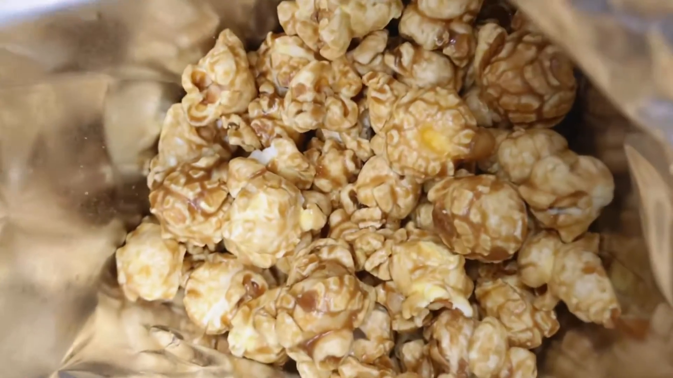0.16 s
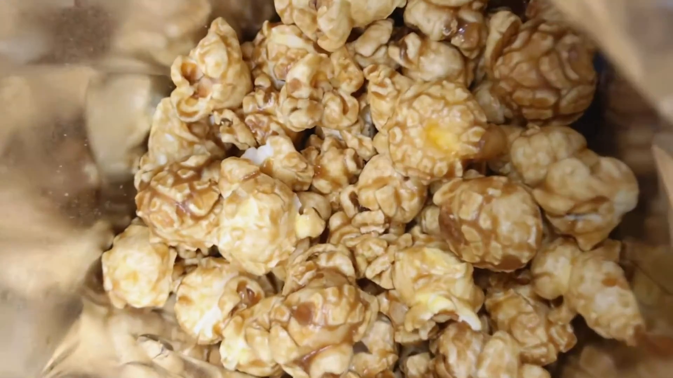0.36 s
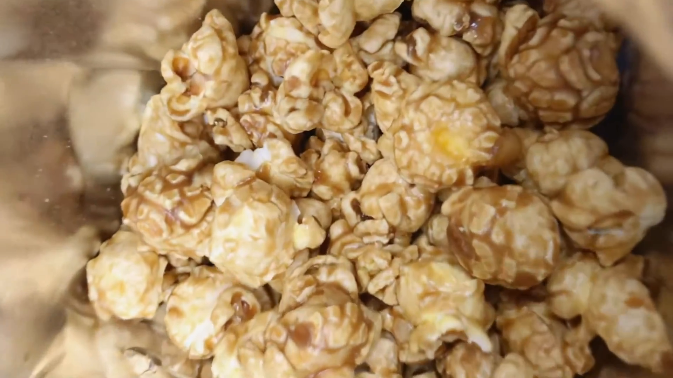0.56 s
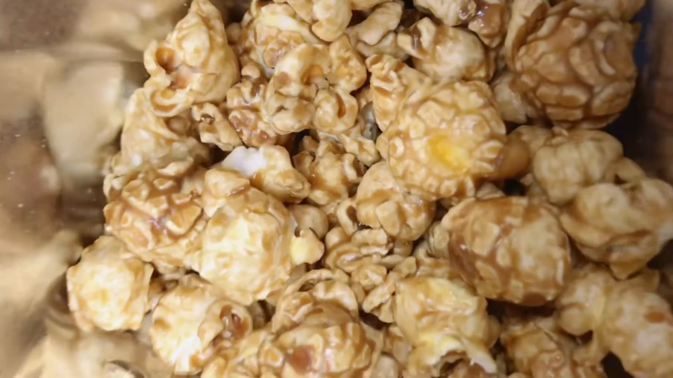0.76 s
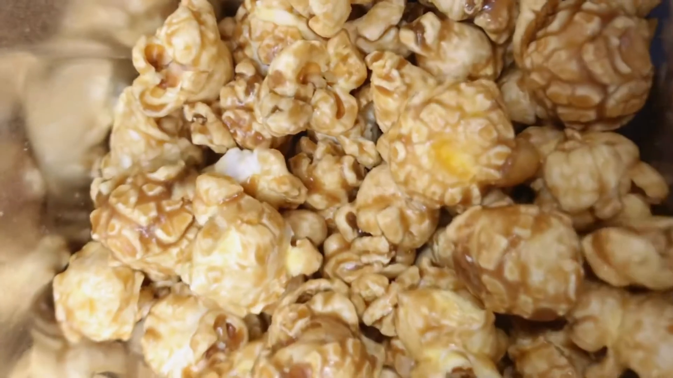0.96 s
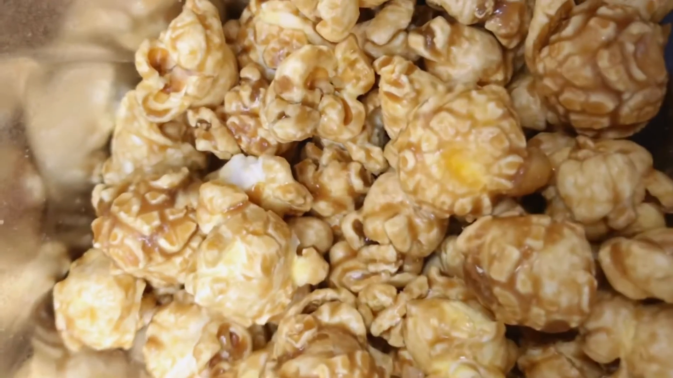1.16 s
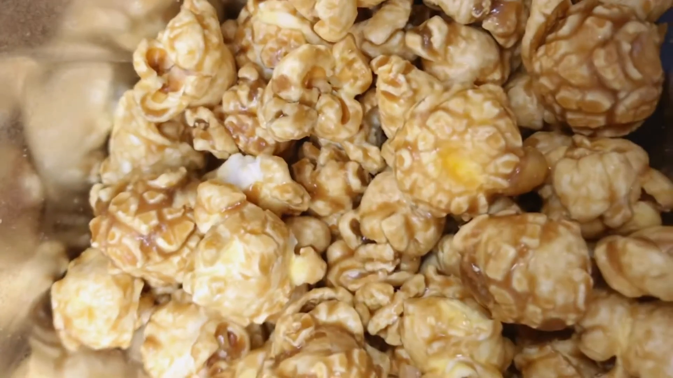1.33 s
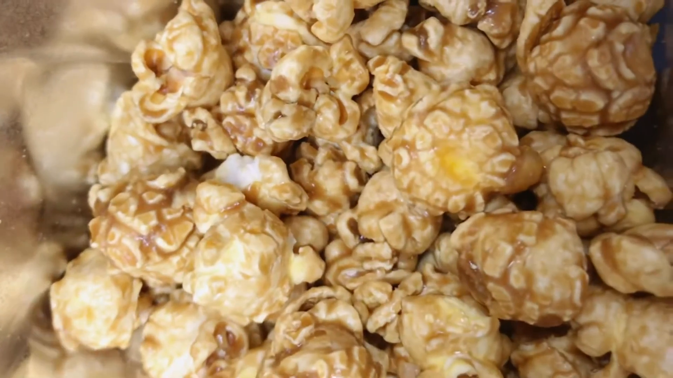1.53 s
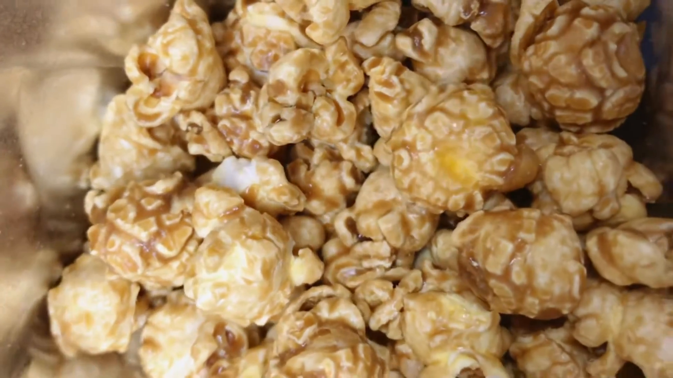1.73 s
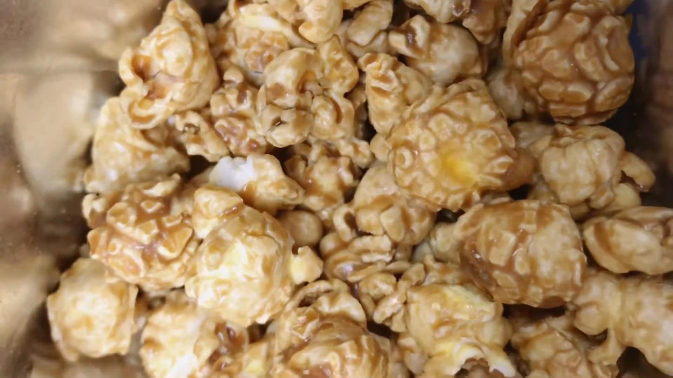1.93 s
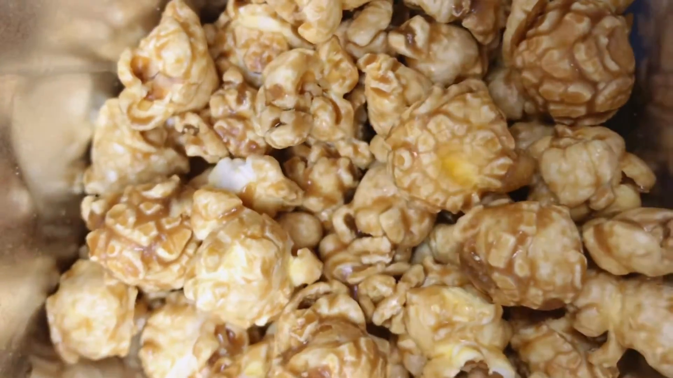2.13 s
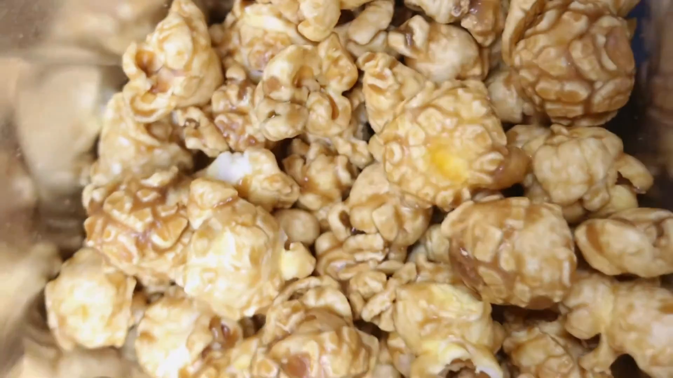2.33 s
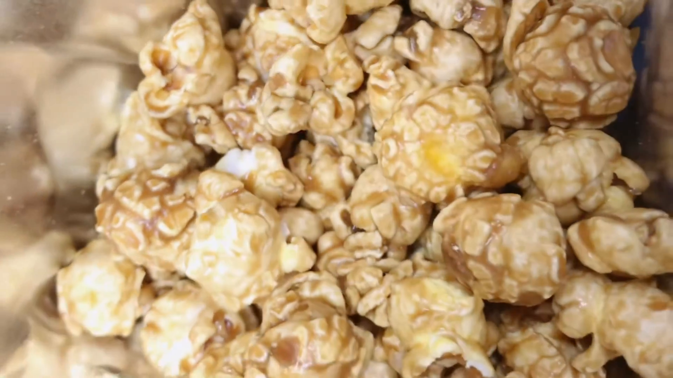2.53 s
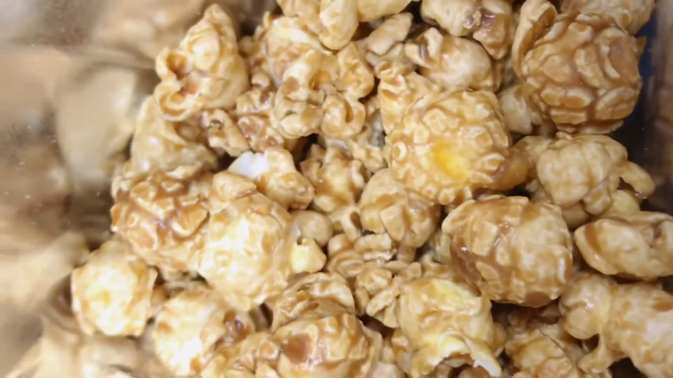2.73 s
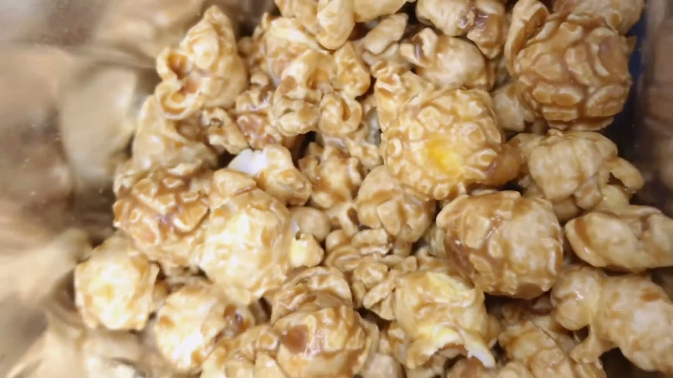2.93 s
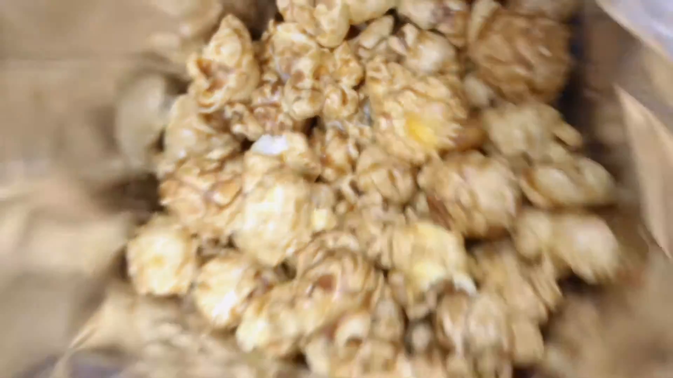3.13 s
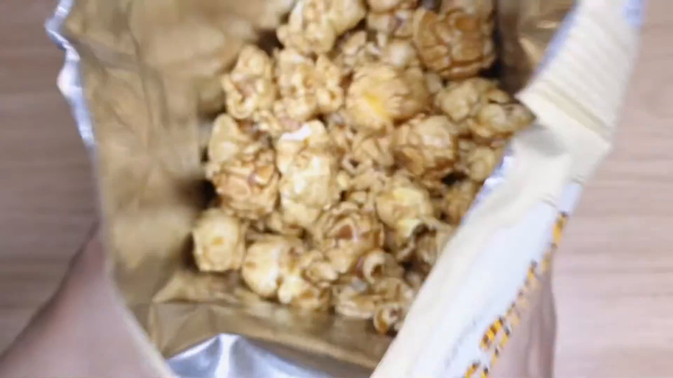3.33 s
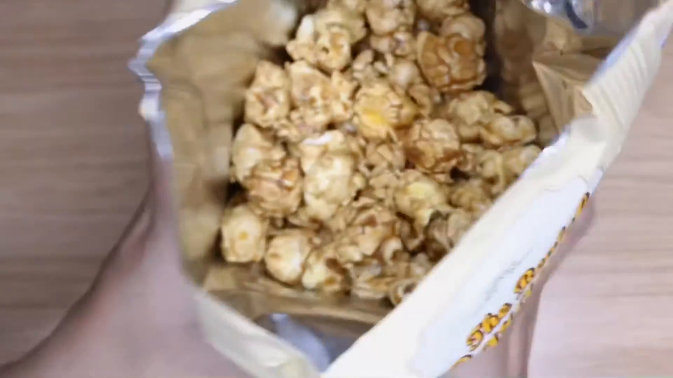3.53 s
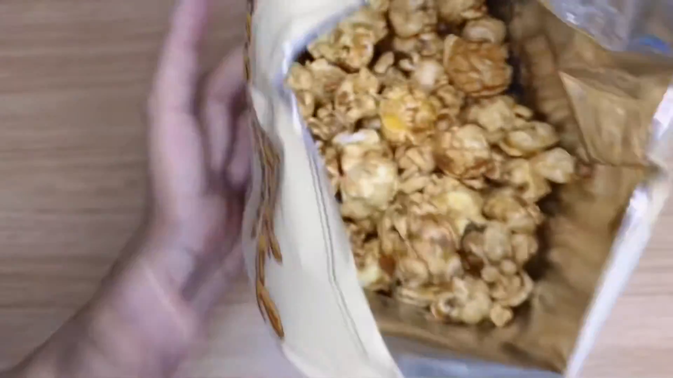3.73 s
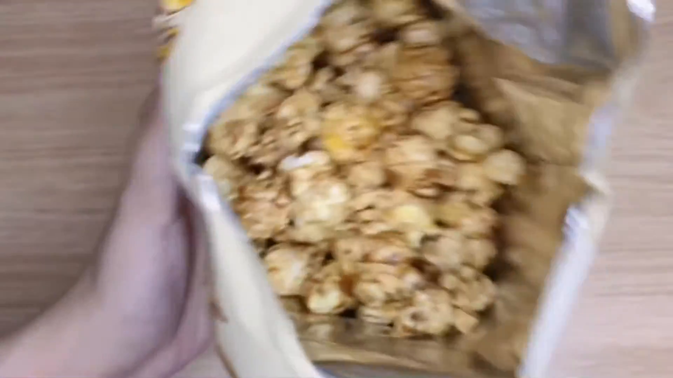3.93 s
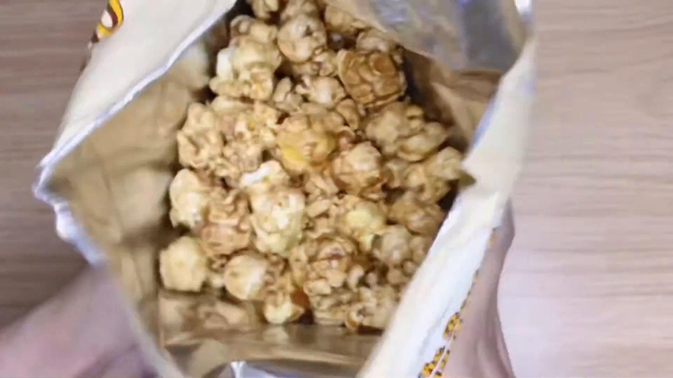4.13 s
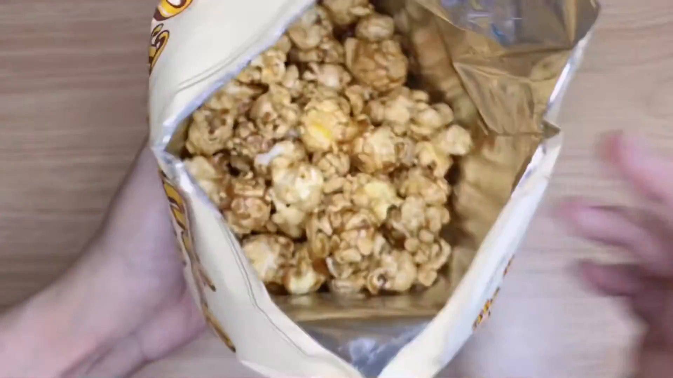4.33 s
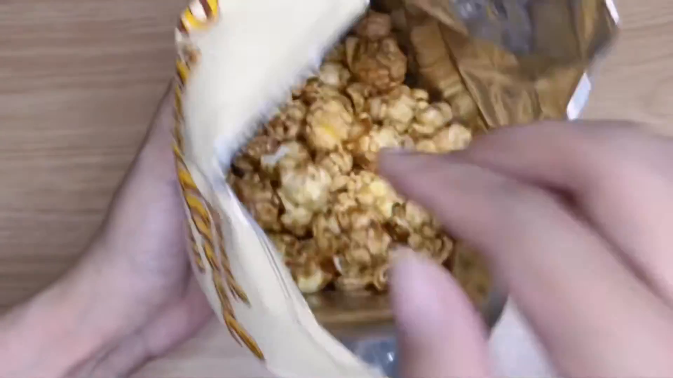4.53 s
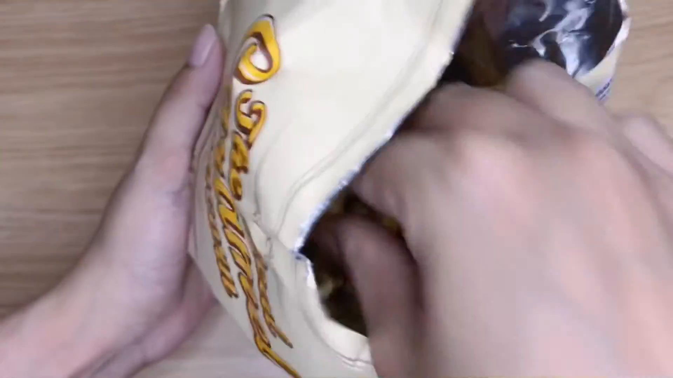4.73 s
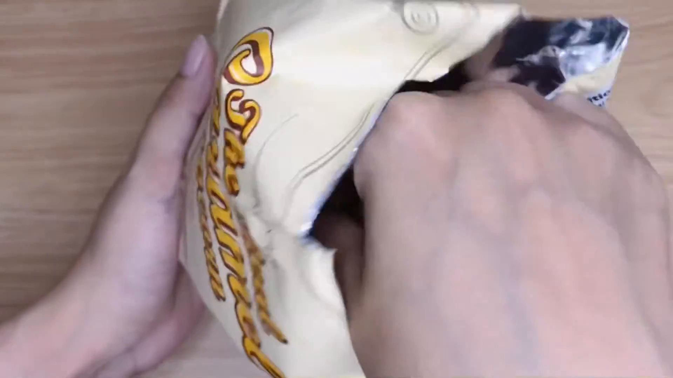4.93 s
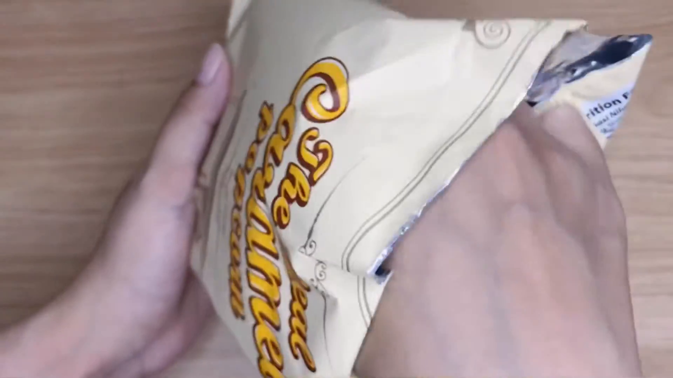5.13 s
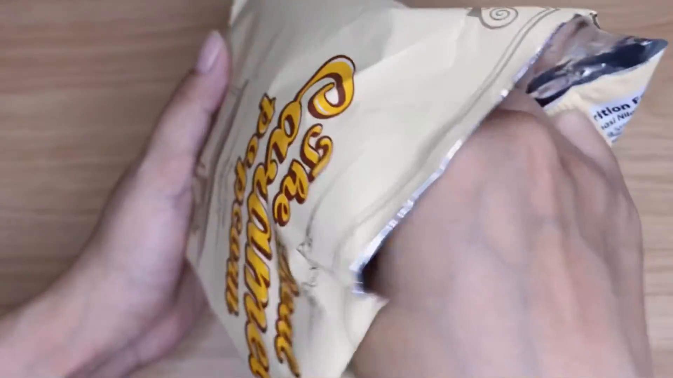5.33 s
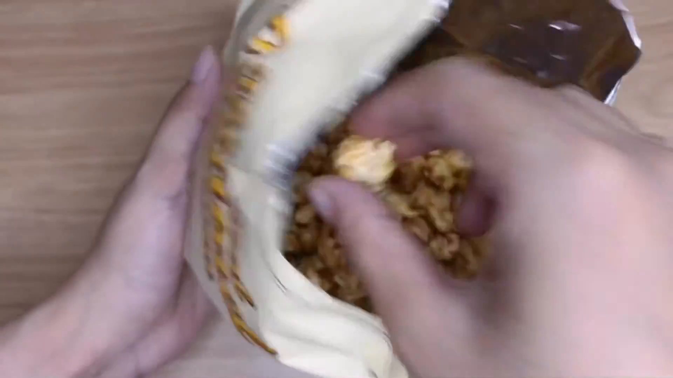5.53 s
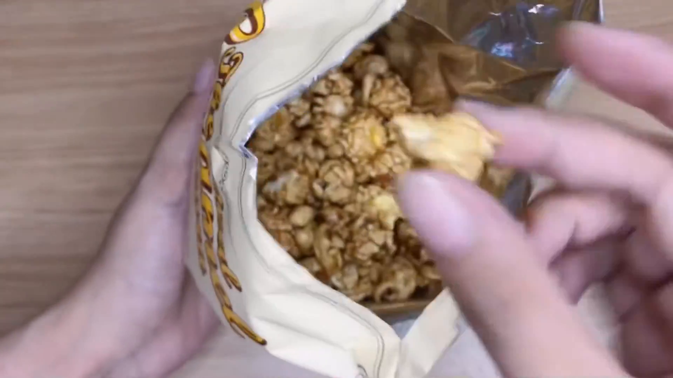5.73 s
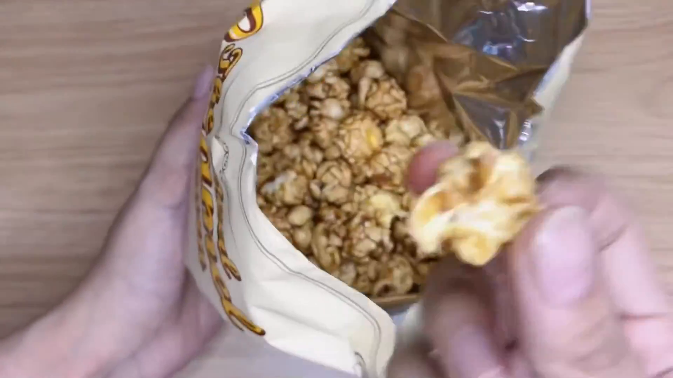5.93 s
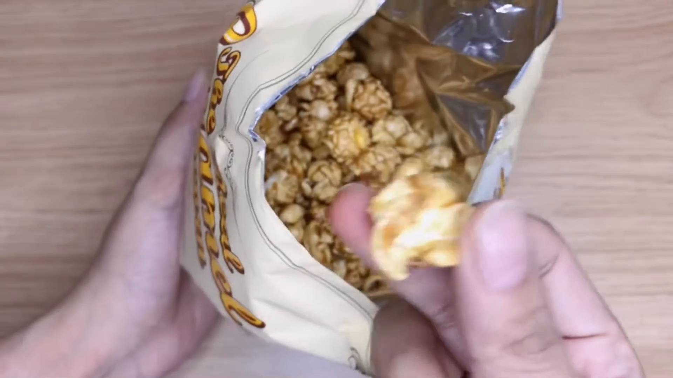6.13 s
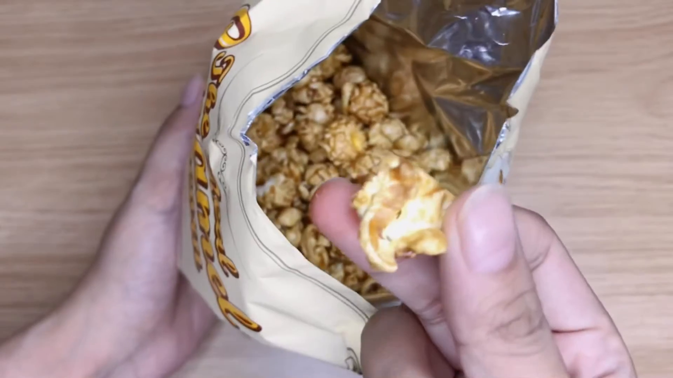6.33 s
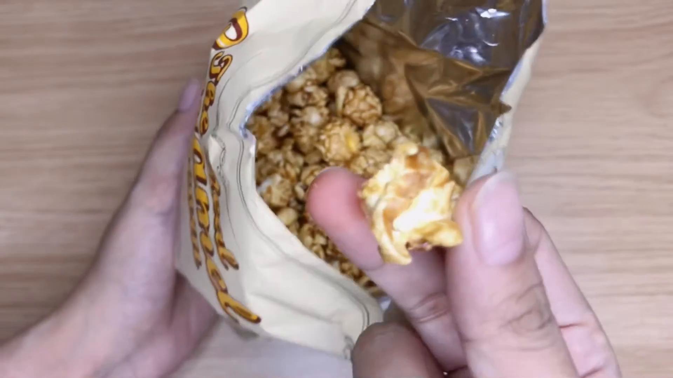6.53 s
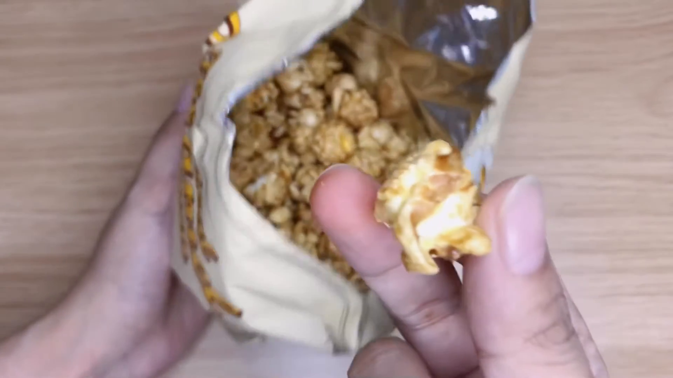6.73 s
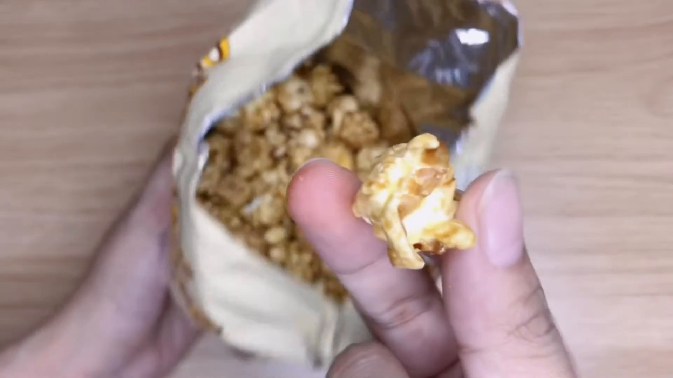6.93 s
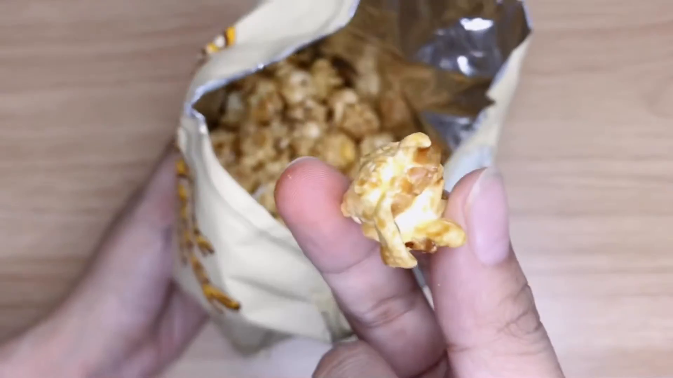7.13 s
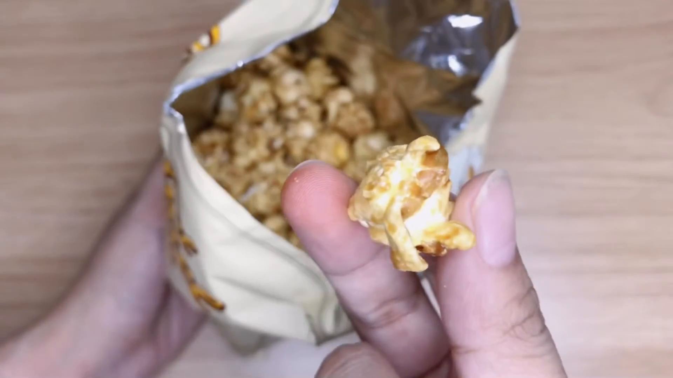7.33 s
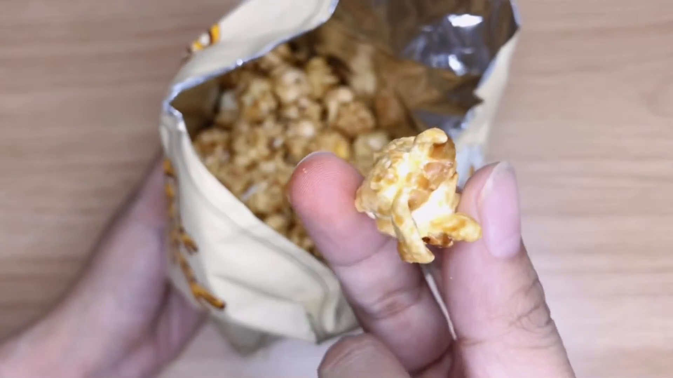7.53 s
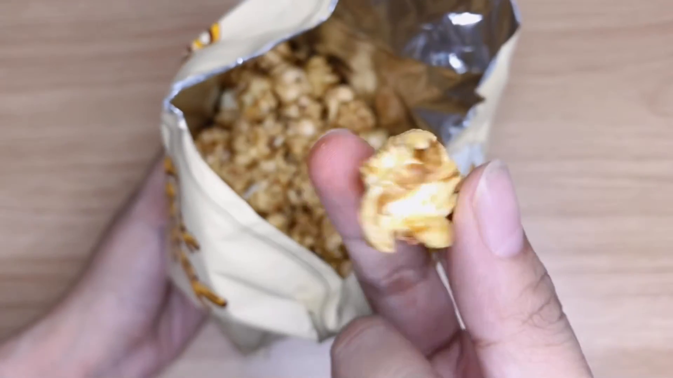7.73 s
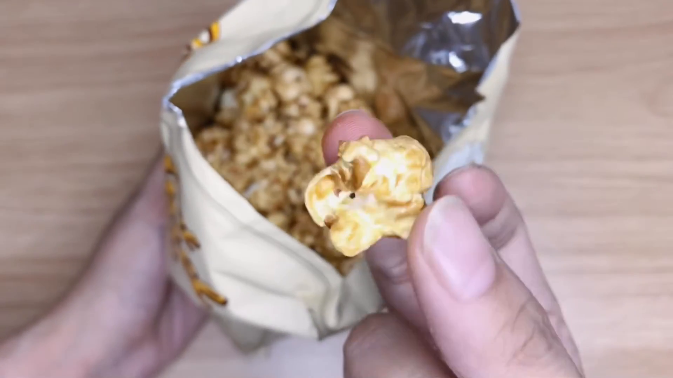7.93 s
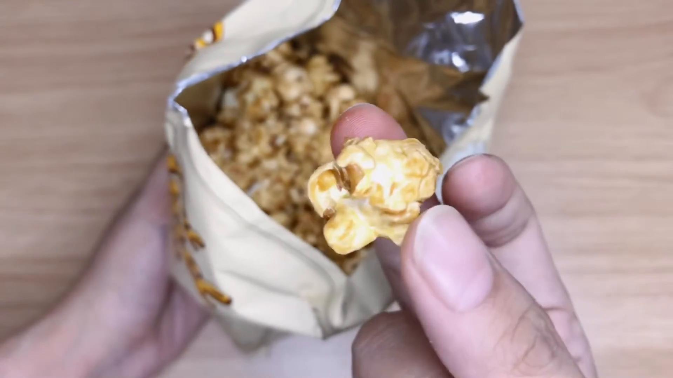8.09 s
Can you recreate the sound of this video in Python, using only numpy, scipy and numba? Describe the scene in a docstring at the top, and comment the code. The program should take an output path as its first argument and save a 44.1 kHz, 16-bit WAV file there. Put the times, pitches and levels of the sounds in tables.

```python
"""In a small soft room with a low hum, a foil-lined snack bag is held close to a phone,
then stands open on a table and is dug into by hand. Creases in the foil buckle and ring
the panels as sums of damped sines; sliding skin and foil give crackle, short squeaks and
band-filtered noise. Soft blows boom, handling rumbles as low thuds over shaped noise,
and near surfaces answer with a short decaying tail of noise."""
import sys
import numpy as np
from scipy import signal
from scipy.fft import rfft, irfft
from scipy.io import wavfile
from scipy.ndimage import uniform_filter1d
from numba import njit

SR = 44100
rng = np.random.default_rng(int(sys.argv[2]) if len(sys.argv) > 2 else 0)


def digitize_waveform(pressure):
    """Quantize a signal to 16-bit integers and store it at the path in sys.argv[1].

    Rows of a 2-D input are taken as channels; values are limited to [-1, 1].
    """
    field = np.atleast_2d(pressure).T
    bounded = np.clip(field, -1, 1)
    quanta = np.round(bounded * 32767).astype(np.int16)
    wavfile.write(sys.argv[1], SR, quanta)


N = 359856
TIME = np.arange(N) / SR  # s
SET_DOWN_S = 3.1  # the bag leaves the phone and comes to stand open on the table

# Spectrum of the room's hum and hiss. Each row: frequency in Hz, relative density in dB per Hz.
ROOM_SPECTRUM = [(25, -39.5), (47, -11.5), (70, 4.5), (108, -20.5), (167, -19.5), (584, -27), (1980, -35),
                 (2670, -36.5), (13300, -45), (15200, -41), (16500, -68.5)]
ROOM_TONE_DB = -49.5  # rms before the hum wavers

# Reverberation of table and near walls. Each row: frequency in Hz, time to fall by 60 dB in s.
REVERBERATION = [(300, 0.15), (3000, 0.22), (8000, 0.13), (15000, 0.021)]
ECHO_DB = -18.5  # energy of the tail re the direct sound

# Spectrum of the handling shudder. Each row: frequency in Hz, relative density in dB per Hz.
SHUDDER_SPECTRUM = [(30, -52), (60, -0.5), (120, -6.5), (250, -2), (450, -8.5), (800, -16.5)]

# Movements of hand and bag. Each row: start in s, time held in s, nominal time to die by 20 dB in s
# (scaled for hiss and rumble; zero or less stops almost at once), relative hiss level in dB,
# its brightness in dB re hiss, relative rumble level in dB.
MOVEMENTS = [(0.2, 0.032, 1.5, -65, 1, -53.5), (0.3, 0.022, -0.1, -41.5, -12, -51),
             (0.628, 0.1, 0.5, -50, -3.5, -43), (0.944, 0.011, 0.4, -52.5, -12, -34),
             (1.071, 0.028, 0.32, -38, -26, -31), (1.4, 0.037, 0.22, -37, -15.5, -45),
             (1.534, 0.011, 0.25, -59, -8, -44), (1.645, 0.017, 0.1, -59, 6, -40.5),
             (1.74, 0.13, -0.1, -57, -4, -55), (1.86, 0.062, 0.03, -49, -1.5, -39),
             (2.24, 0.072, 0.8, -68, 5, -50.5), (3.02, 0.07, 3.5, -54.5, -0.5, -47.5),
             (3.111, 0.096, 0.67, -46, -3.5, -40.5), (3.208, 0.077, 0.04, -38, -2.5, -39),
             (3.355, 0.028, 2, -61, -12.5, -52.5), (3.453, 0.0042, 0.15, -32.5, -2, -34.5),
             (3.614, 0.16, 0.13, -43, -2.5, -41.5), (3.93, 0.015, -1.6, -48, -1.5, -67),
             (3.981, 0.013, 0.14, -31.5, -4.5, -35), (4.03, 0.097, 0.2, -44.5, 4, -36.5),
             (4.14, 0.037, 0.29, -37, -4.5, -30), (4.234, 0.073, 0.09, -34, 2, -29),
             (4.55, 0.061, 2.5, -50, 2.5, -52), (4.63, 0.029, 0.4, -37.5, -19, -38),
             (4.685, 0.085, 0.41, -32, -5, -30.5), (4.96, 0.058, 0.3, -42.5, -5.5, -34.5),
             (5.001, 0.016, 0.06, -30, -10, -34), (5.055, 0.0049, 0.2054, -34, 0, -36.5),
             (5.251, 0.038, 0.42, -40, -4.5, -47), (5.401, 0.068, 0.69, -44.5, -7, -40),
             (5.5, 0.0093, 0.16, -39, 7, -46), (5.55, .08, -0.16, -51, 8.5, -48.5),
             (5.737, 0.0083, 0.26, -50.5, 24, -43), (6.26, 0.039, 0.87, -61.5, -1.5, -50),
             (6.615, 0.037, 0.23, -45.5, -8, -78), (6.719, 0.094, 0.34, -57, -2, -63),
             (6.894, 0.063, -0.01, -46.5, -1, -53.5), (6.979, 0.013, 0.1057, -40.5, -4, -38),
             (7.055, 0.023, 0.01, -51.5, -14, -67)]
HISS_RISE_S, HISS_FADE = 0.017, 0.72  # time to gain the last 20 dB; factor on the dying time
RUMBLE_RISE_S, RUMBLE_FADE = 0.04, 0.58  # the heavier rumble starts slower
REST_HISS_DB, REST_BRIGHT_DB, REST_RUMBLE_DB = -68.5, 2, -61.5  # the hands merely hold the bag
CONTROL_STEP = 64  # samples between computed points of the movement curves

# Soft blows of bag, hands and snack. Each row: time of touch in s, relative level in dB,
# nominal pitch in Hz.
BLOWS = [(0.197, -26, 555), (0.678, -28, 165), (0.756, -31.5, 190), (0.939, -32, 187), (1.167, -15, 311),
         (1.381, -36, 203), (1.533, -33, 240), (1.571, -30.5, 151.6), (1.756, -19.5, 376),
         (1.846, -35.5, 135), (2.243, -37.5, 156), (3.121, -27, 423), (3.203, -20, 290), (3.258, -22, 251),
         (3.452, -16, 214), (3.975, -28.5, 174), (4.157, -20.5, 176), (4.233, -16.5, 370),
         (4.673, -19.5, 560), (4.716, -17, 1030), (4.76, -16.5, 304), (4.805, -17.5, 1070),
         (4.993, -21, 610), (5.181, -34.5, 347), (5.403, -26, 463), (5.723, -26, 442), (6.43, -36, 323),
         (6.586, -31.5, 1000), (6.975, -23, 339), (7.516, -34.5, 400)]

# Spectrum of sliding skin and foil. Each row: frequency in Hz, relative density in dB per Hz.
SLIDE_SPECTRUM = [(240, -30), (400, -7), (906, -11.5), (2050, -11), (4510, -14), (10400, -15.5),
                  (16000, -20.5)]

# Fingertips rubbing a taut patch of foil. Each row: start in s, length in s,
# base pitch of the patch in Hz, relative level in dB.
FOIL_RUBS = [(1.395, 0.048, 1880, -47), (1.445, .052, 3900, -47.5), (1.53, 0.028, 3620, -51),
             (1.675, 0.015, 2620, -52), (1.702, 0.019, 3600, -51), (1.771, .02, 2900, -56),
             (3.335, .06, 1880, -55), (5.742, .06, 6000, -52), (5.933, 0.077, 4000, -57.5),
             (5.989, .024, 2700, -50), (6.625, .055, 3000, -55)]

# Partials of a rubbed patch. Each row: ratio to the base pitch, relative level in dB.
PATCH_PARTIALS = [(1, 3), (1.55, -1.5), (2.2, -6.5), (3.1, -9)]

# Resonances of the bag's panels. Each row: frequency in Hz, relative level in dB,
# nominal time to fall by 60 dB in s.
PANEL_MODES = [(742, -6, 0.018), (1136, -1, 0.021), (1700, -0.5, 0.018), (2350, -8.5, 0.011),
               (3134, -5.5, 0.018), (4250, -5, 0.014), (5100, -7.5, 0.011), (6577, 0, 0.01),
               (8580, 0.5, 0.011), (11420, 0.5, 0.0078), (13540, -4, 0.012)]
BIG_PANEL_HZ = 1800  # panels that ring below this count as big
CRISP_FROM_HZ = 4110  # crispness counts in full an octave above this, and more further up

# Loud creases that buckle. Each row: time in s, relative level in dB, big panels in dB re level,
# crispness near 8 kHz in dB re level.
CREASES = [(0.2036, -40, 9.5, -15), (0.31, -33.5, -5, -22), (0.465, -47.5, 15.5, -22),
           (0.6658, -32, -13, -8), (0.6829, -8, -2, -7.5), (0.908, -45.5, 4.5, 3.5),
           (0.9452, -36.5, 1.5, -6.5), (1.021, -25, -12, -38), (1.0265, -22.5, -26, -9.5),
           (1.042, -26, -7, -16), (1.056, -28.5, -16, -30), (1.073, -31, -20, -30), (1.093, -29, -16, -20),
           (1.1705, -8.5, 1.5, -8), (1.179, -21, 1, -32), (1.375, -46, 8, -8), (1.64, -34, -5, -18),
           (1.6576, -34.5, -9, -4.5), (1.7313, -35, -5, -20), (1.76, -41, 14.5, -31), (1.8621, -35, 2, -10),
           (1.881, -39, 4, -12), (1.9023, -37, -8, 1.5), (1.9198, -19.5, -3.5, -26), (3.004, -39, -4, -2.5),
           (3.1313, -25.5, -2, -7), (3.158, -32.5, 11.5, -26), (3.2082, -8, -4, -7),
           (3.2152, -24.5, -4, -5), (3.256, -18, -3.5, -13), (3.265, -23, -3.5, -7.5),
           (3.2857, -23.5, 5.5, -27), (3.3564, -33, -4, -32), (3.4486, -7.5, -1.5, 2),
           (3.6176, -17, -2.5, -4), (3.631, -9, -7.5, -13), (3.6551, -18, 0, -9.5), (3.6836, -6, -17, -25),
           (3.7328, -10, -16, -21), (3.7735, -32, 5.5, -4), (3.81, -24, -7, -17), (3.819, -22.5, -3.5, -5),
           (3.83, -20.5, -5.5, -24), (3.976, -25.5, 7, 0), (3.9866, -20.5, 1.5, -3.5),
           (4.086, -27, -1, -31), (4.1386, -14, -5.5, -15), (4.15, -14, -3, -31), (4.1611, -7.5, -5.5, -1),
           (4.2371, -8, -9, -6), (4.251, -14, -6.5, -27), (4.298, -21, -24, -28), (4.5475, -28, -5, -12),
           (4.6141, -7.5, -2, -12.5), (4.6397, -26.5, -2, -16), (4.665, -21, -3, -17), (4.6768, -3, -5, -4),
           (4.7023, -18, -10, -5), (4.7181, -19, -3.5, -6), (4.728, -24, -9, -15), (4.744, -10, -20, -0.5),
           (4.757, -12, -5, -2.5), (4.7604, -6.5, -13, -4), (4.764, -4.5, -1, -20),
           (4.8122, -15, -10, -8.5), (4.816, -3.5, -15, -7), (4.835, -23.5, -3, -0.5),
           (4.8556, -2.5, -9.5, -13.5), (4.9405, -9, -17.5, -8.5), (4.9516, -15.5, -1.5, -3),
           (4.968, -28, -1, -24), (4.985, -17, -2, -13), (4.9979, -3.5, -15, -3.5), (5.001, -8, -13.5, 1),
           (5.007, -15, -14, -14), (5.022, -26, -5.5, -15), (5.0579, -6, -13.5, -12),
           (5.069, -6.5, -36, -12), (5.0879, -11.5, -36, 0), (5.136, -28, -1, -24),
           (5.233, -13.5, -3.5, -12), (5.2576, -7.5, -3, -7.5), (5.2889, -9, -17.5, -17),
           (5.3178, -30, 0, -9), (5.369, -17.5, -4, -23), (5.407, -7, -25, -12.5), (5.4253, -29, 5.5, 2.5),
           (5.4385, -12.5, -11, -11), (5.478, -13, -23.5, -18.5), (5.489, -27.5, -19.5, -1),
           (5.5054, -5, -18.5, -1.5), (5.68, -17, -20, -42), (5.7345, -8, -15.5, 3),
           (5.8293, -31.5, -10, -10), (6.5747, -13, -0.5, -41), (6.6143, -5, -12.5, -15),
           (6.803, -44.5, -17, 0), (6.855, -37, -10, -2.5), (6.866, -37, -12, -3), (6.878, -36, -10, -5),
           (6.9, -29, -6.5, -18), (6.9278, -16.5, -9, -8.5), (6.9792, -22, -7, -11),
           (7.0495, -38.5, 15, -20), (7.519, -40.5, 10, -13)]

CAVITY_HZ, CAVITY_Q, CAVITY_DB = 1087, 7.6, -3.5  # the air inside the open bag

# Dips of the phone's sound port. Each row: frequency in Hz, sharpness Q.
PORT_NOTCHES = [(4800, 21.4), (7600, 13), (10400, 13)]
TOP_HZ = 16000  # upper limit of the phone


def undb(db):
    """Logarithmic levels: decibels to amplitude gain."""
    return 10 ** (np.asarray(db) / 20)


def colour(x, shape):
    """Spectral shaping: weight x by (Hz, dB) points joined along log frequency, then bring to rms 1."""
    hz, db = np.transpose(shape)
    bins = np.maximum(np.fft.rfftfreq(len(x), 1 / SR), 1)
    gain = undb(np.interp(np.log(bins), np.log(hz), db, left=-70, right=-70))
    y = irfft(rfft(x) * gain, len(x))
    return y / np.sqrt(np.mean(y ** 2))


def walk(rate):
    """Slow random fluctuation: levels held 1 / rate s and smoothed twice; spread near 1."""
    hold = int(SR / rate)
    steps = np.repeat(rng.standard_normal(N // hold + 1), hold)
    return 1.3 * uniform_filter1d(uniform_filter1d(steps, hold), hold)[:N]


@njit
def ring(length, start, hz, t60, size):
    """Free vibration: a sum of damped sines, each from its start sample until it has fallen by 60 dB."""
    out = np.zeros(length)
    for k in range(len(start)):
        turn = np.exp((2j * np.pi * hz[k] - np.log(1000) / t60[k]) / SR)
        z = size[k] + 0j
        for i in range(max(start[k], 0), min(length, start[k] + int(t60[k] * SR))):
            out[i] += z.imag
            z *= turn
    return out


def strokes(db, rise_s, fade):
    """Addition of powers: each movement rises steadily in dB, holds, then falls steadily in dB."""
    start, held, dies = (c[:, None] for c in np.transpose(MOVEMENTS)[:3])
    t = TIME[::CONTROL_STEP]
    before = np.maximum(start - t, 0)
    after = np.maximum(t - start - held, 0)
    fall_s = np.maximum(fade * dies, .005)
    return undb(db[:, None] - 20 * before / rise_s - 20 * after / fall_s) ** 2


def movement():
    """Power-weighted mean: hiss, brightness and rumble in dB; the loudest movement rules the brightness."""
    hiss_db, bright_db, rumble_db = np.transpose(MOVEMENTS)[3:]
    slide = strokes(hiss_db, HISS_RISE_S, HISS_FADE)
    rest = undb(REST_HISS_DB) ** 2
    total = slide.sum(0) + rest
    bright = (bright_db @ slide + REST_BRIGHT_DB * rest) / total
    shake = strokes(rumble_db, RUMBLE_RISE_S, RUMBLE_FADE).sum(0) + undb(REST_RUMBLE_DB) ** 2
    curves = 10 * np.log10(total), bright, 10 * np.log10(shake)
    return [np.interp(TIME, TIME[::CONTROL_STEP], c) for c in curves]


def room_tone():
    """Stationary noise with slow amplitude modulation: a low hum wavers over a faint steady hiss."""
    noise = colour(rng.standard_normal(N), ROOM_SPECTRUM)
    hum = signal.sosfilt(signal.butter(2, 110, fs=SR, output="sos"), noise)
    waver = undb(1.5 * walk(3.7))
    return undb(ROOM_TONE_DB) * (noise + (waver - 1) * hum)


def echoes(x):
    """Reverberation by convolution: a dense noise tail decays at its own rate in each half octave."""
    t, tail = TIME[:SR // 3], 0
    room_hz, room_t60 = np.transpose(REVERBERATION)
    for hz in 200 * 2. ** np.arange(0, 6.6, .5):
        t60 = np.interp(np.log(hz), np.log(room_hz), room_t60)
        edges = [hz / 2 ** .25, min(hz * 2 ** .25, .49 * SR)]
        band = signal.butter(2, edges, "band", fs=SR, output="sos")
        decay = undb(-60 * t / max(t60, .01))
        tail = tail + signal.sosfilt(band, rng.standard_normal(len(t))) * decay
    tail = tail * np.minimum(t / 0.00087, 1)  # brief build-up
    return undb(ECHO_DB) * signal.fftconvolve(x, tail / np.sqrt(np.sum(tail ** 2)))[:N]


def cavity(x):
    """Cavity resonance: standing open on the table, the bag lends a short hollow ring."""
    hollow = signal.lfilter(*signal.iirpeak(CAVITY_HZ, max(CAVITY_Q, 1), fs=SR), x)
    opened = np.clip((TIME - SET_DOWN_S) * 2, 0, 1)  # full after half a second
    return x + undb(CAVITY_DB) * opened * hollow


def rumble(rumble_db):
    """Forced low vibration: handling shakes bag, table and phone in random thuds over a faint shudder."""
    chance = rng.random((int(N / SR * 80), 3))  # 80 thuds a second
    s = chance[:, 0] * N / SR
    hz = 85 * 6 ** chance[:, 1]
    stand_out_db = np.minimum(-3.36 * np.log(chance[:, 2]), 6)
    size = undb(np.interp(s, TIME, rumble_db) + 5.0 + stand_out_db)
    thuds = ring(N, (s * SR).astype(np.int64), hz, 7.2 / hz, size)
    thuds = signal.sosfilt(signal.butter(2, 500, fs=SR, output="sos"), thuds)
    shudder = colour(rng.standard_normal(N), SHUDDER_SPECTRUM)
    return thuds + shudder * undb(rumble_db - 6 + 3 * walk(25))


def knocks():
    """Impulse response of a soft body: the filled bag booms near its pitch and on an overtone."""
    s, db, hz = np.transpose(BLOWS)
    parts = np.array([(1.066, 2.5, 10.5), (1.7, -9, 19.0)])  # (pitch ratio, dB, cycles to -60 dB)
    pitch = np.outer(hz, parts[:, 0])
    t60 = parts[:, 2] / pitch
    size = undb(db[:, None] + parts[:, 1])
    start = np.repeat((s + .004) * SR, len(parts)).astype(np.int64)  # the boom follows the touch
    return ring(N, start, pitch.ravel(), t60.ravel(), size.ravel())


def hiss(hiss_db, bright_db):
    """Sliding friction: noise bands flutter together and each alone, as patches of foil catch and slip."""
    noise = colour(rng.standard_normal(N), SLIDE_SPECTRUM)
    flutter_db = 1.6 * walk(70) + 1.5 * walk(500)
    out = 0
    for hz in 400 * 2. ** np.arange(0, 5.3, .75):
        edges = [hz, min(hz * 2 ** .75, .45 * SR)]
        band = signal.butter(1, edges, "band", fs=SR, output="sos")
        share = np.clip(np.log2(hz / 1000) / 2.8, 0, 1)  # brightness tilts the hiss above 1 kHz
        out = out + signal.sosfilt(band, noise) * undb(share * bright_db + 2.5 * walk(25))
    return out * undb(hiss_db + flutter_db - 3.5)


def rubs():
    """Stick-slip: skin slips thousands of times a second, each slip rings the patch; the rub stops dead."""
    start, length, hz, db = (c[:, None] for c in np.transpose(FOIL_RUBS))
    chance = rng.random((len(FOIL_RUBS), 4, 240))  # 240 slips in each rub
    partial = (chance[:, 0] * len(PATCH_PARTIALS)).astype(int)
    ratio, part_db = np.transpose(PATCH_PARTIALS)[:, partial]
    pitch = np.minimum(hz * ratio * (1 + .42 * (chance[:, 1] - .5)), .45 * SR)
    # longer rubs have sparser slips, so each is made stronger
    size = undb(db + part_db - 3.0 * np.log(chance[:, 2])) * np.sqrt(20 * length)
    slip = ((start + length * chance[:, 3]) * SR).astype(np.int64)
    return ring(N, slip.ravel(), pitch.ravel(), (15 / pitch).ravel(), size.ravel())


def buckle(s, db, low_db, high_db, count, scatter_db, spread_s, damping):
    """Modal excitation: a crease rings each panel count times, with scattered pitch, strength and moment."""
    hz, panel_db, t60 = np.tile(np.transpose(PANEL_MODES), count)
    chance = rng.standard_normal((len(s), 4, len(hz)))
    crisp = np.maximum(hz / CRISP_FROM_HZ - 1, 0)
    share_db = np.where(hz < BIG_PANEL_HZ, low_db[:, None], high_db[:, None] * crisp)
    size = undb(db[:, None] + panel_db + share_db + scatter_db * chance[:, 0])
    size = size * np.sign(chance[:, 3])
    # about half answer at once, the rest lag, big panels the most
    lag = spread_s * np.maximum(chance[:, 1], 0) * np.sqrt(1000 / hz)
    start = ((s[:, None] + lag) * SR).astype(np.int64)
    pitch = np.minimum(hz * (1 + .13 * chance[:, 2]), .45 * SR)
    return ring(N, start.ravel(), pitch.ravel(), np.tile(t60 * damping, len(s)), size.ravel())


def crackle(hiss_db, bright_db):
    """Random small bucklings: countless creases give way while the foil slides; a few stand out."""
    chance = rng.random((int(N / SR * 400), 4))  # 400 creases a second
    s = chance[:, 0] * N / SR
    stand_out_db = np.minimum(-3.8 * np.log(chance[:, 1]), 13)
    db = np.interp(s, TIME, hiss_db) - 9.0 + stand_out_db
    db = db - 9 * (s < SET_DOWN_S)  # finer while the bag is only held
    low_db = 14 * (chance[:, 2] - .5) - 3
    high_db = np.interp(s, TIME, bright_db) - 9.0 + 14 * (chance[:, 3] - .5)
    return buckle(s, db, low_db, high_db, count=2, scatter_db=4.0, spread_s=.0006, damping=0.59)


def snaps():
    """Snap-through buckling: the loud creases strike the panels; their sound carries little below about 550 Hz."""
    s, db, low_db, high_db = np.transpose(CREASES)
    rung = buckle(s, db - 11.5, low_db, high_db, count=10, scatter_db=1, spread_s=.0006, damping=0.86)
    return signal.sosfilt(signal.butter(2, 550, "high", fs=SR, output="sos"), rung)


def scene():
    """Superposition: the bag's sources with their echoes and cavity, the rumble and the room."""
    hiss_db, bright_db, rumble_db = movement()
    bag = snaps() + crackle(hiss_db, bright_db) + knocks() + rubs()
    near = cavity(bag + echoes(bag) + hiss(hiss_db, bright_db))
    return (near + rumble(rumble_db) + room_tone())[None]


def record(dry):
    """Band limits and saturation: the phone drops deep bass, dips at its port, rounds peaks, cuts the top."""
    x = signal.sosfilt(signal.butter(4, 44, "high", fs=SR, output="sos"), dry)
    for hz, q in PORT_NOTCHES:
        x = (x + signal.lfilter(*signal.iirnotch(hz, q, fs=SR), x)) / 2  # a dip of 6 dB
    rounded = np.tanh(.5 * x) / .5
    return signal.sosfilt(signal.ellip(10, .2, 70, TOP_HZ, fs=SR, output="sos"), rounded)


dry = scene()
out = record(dry)
digitize_waveform(out)
```